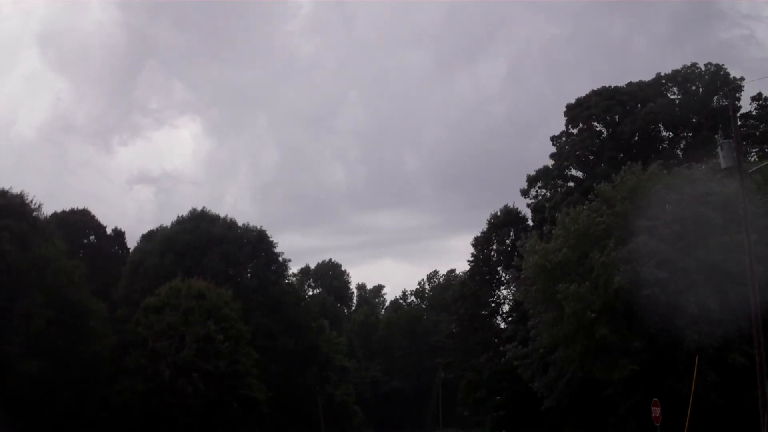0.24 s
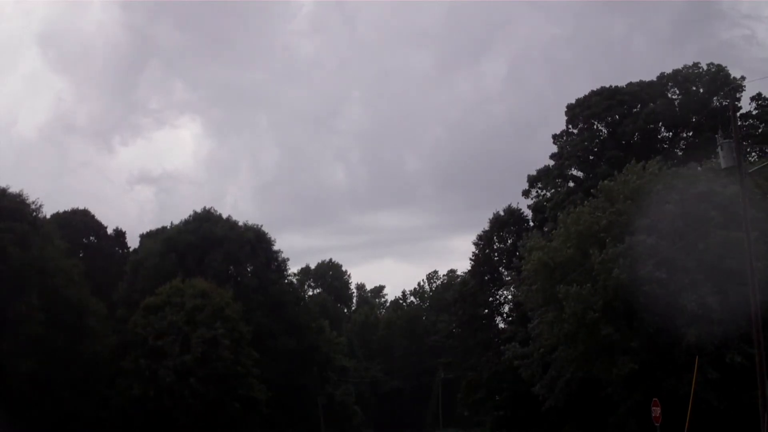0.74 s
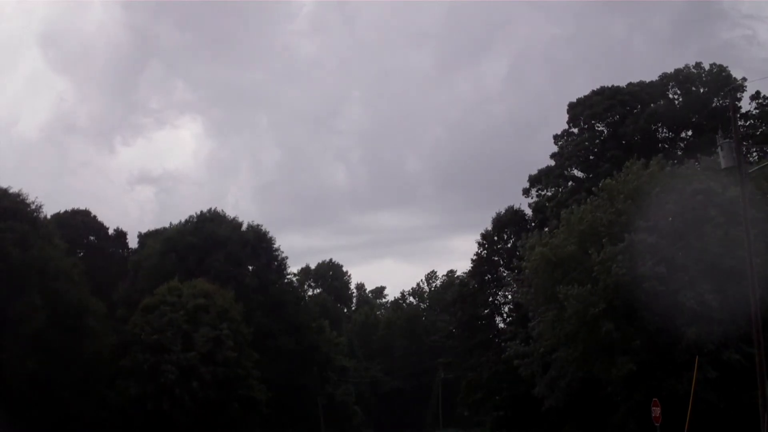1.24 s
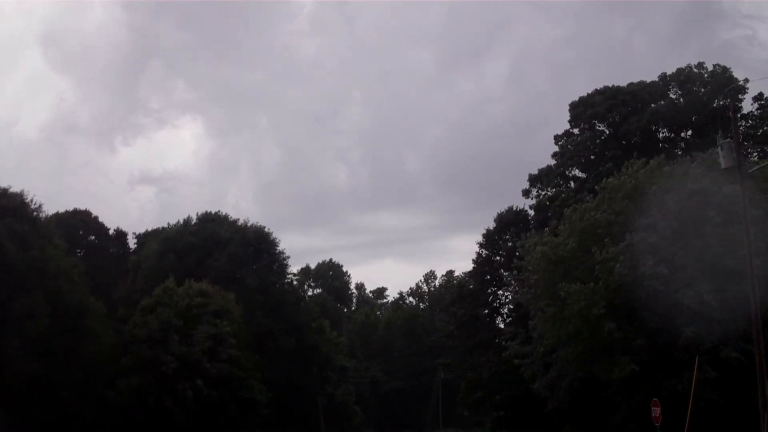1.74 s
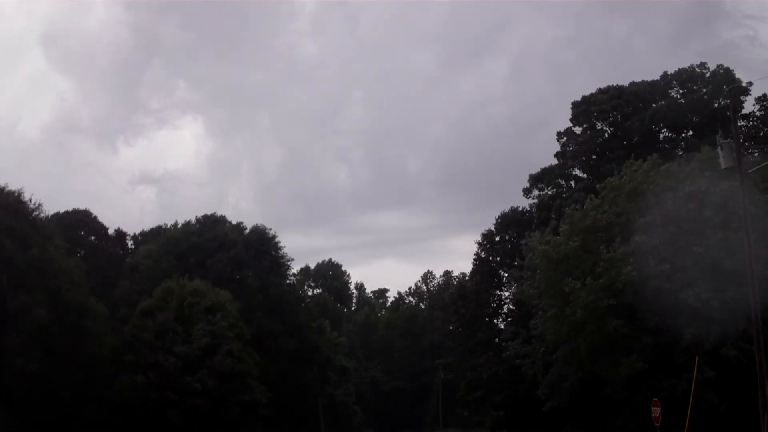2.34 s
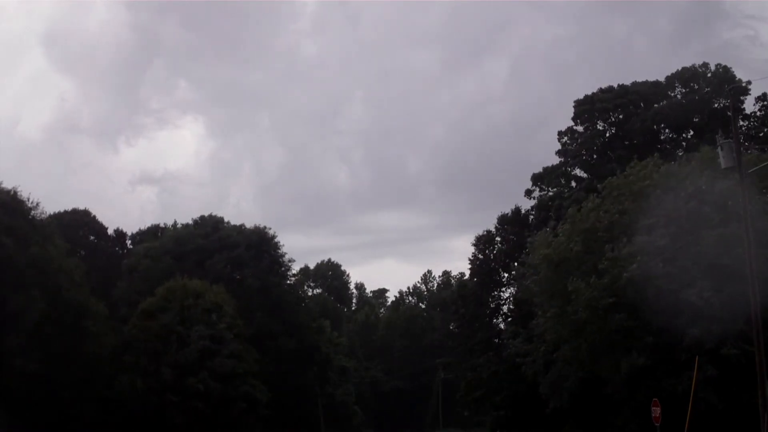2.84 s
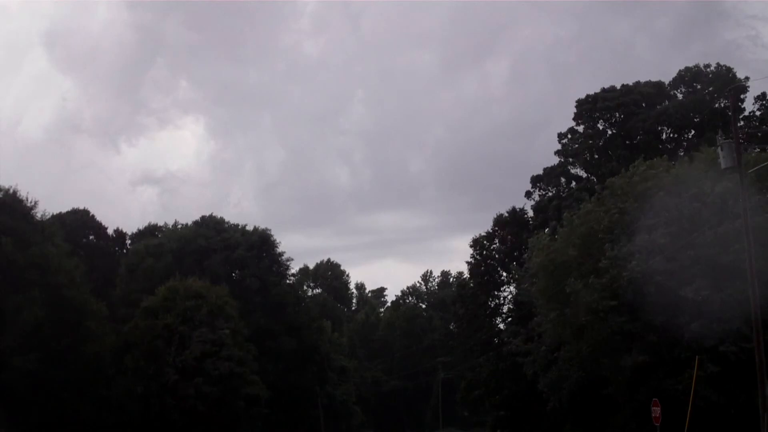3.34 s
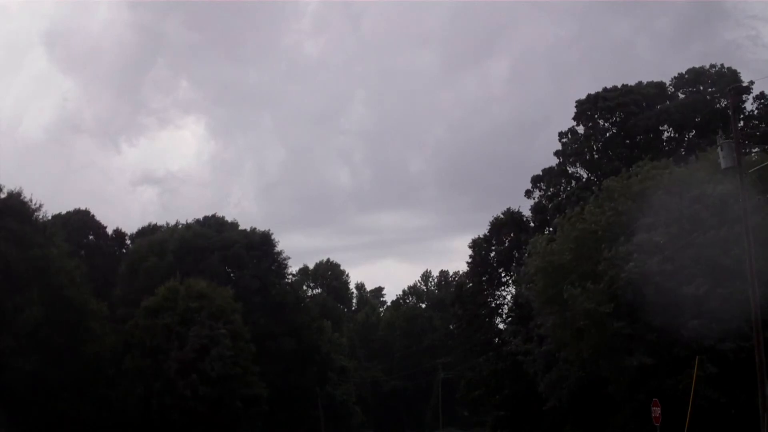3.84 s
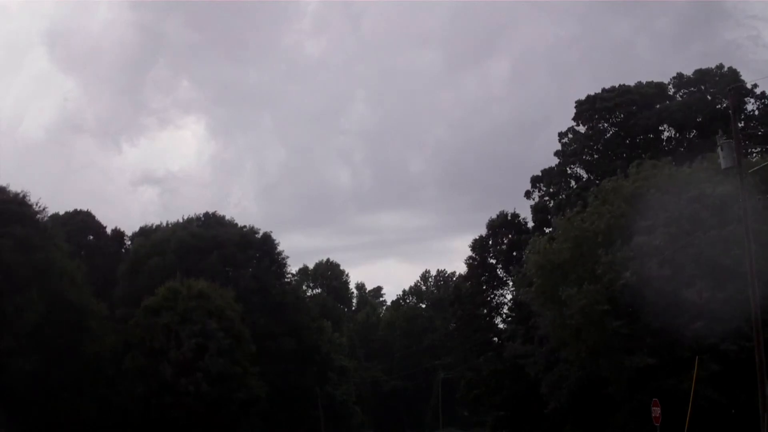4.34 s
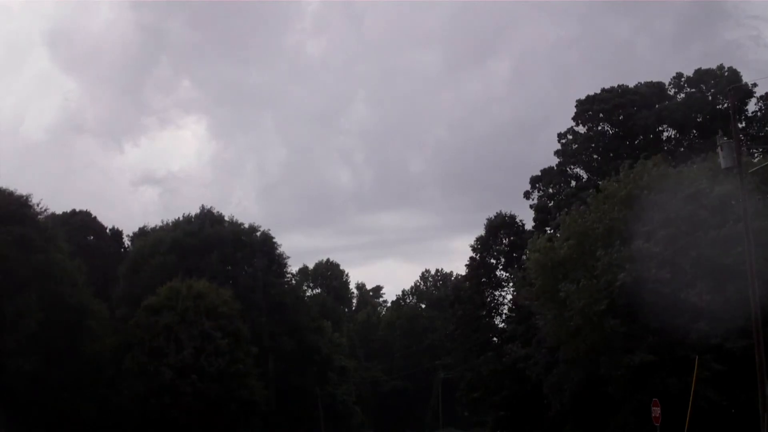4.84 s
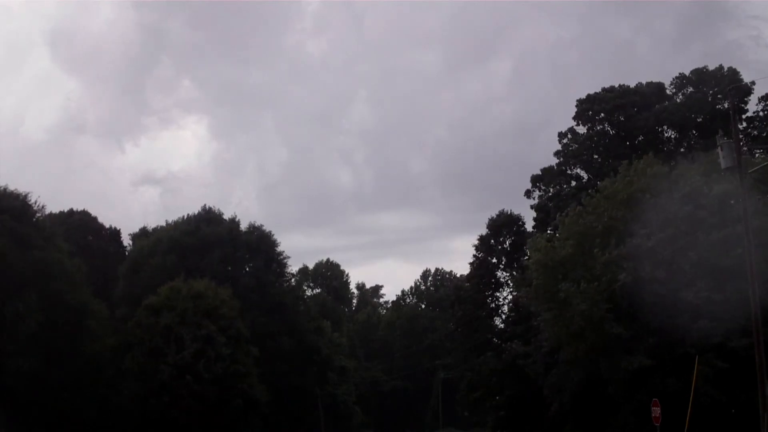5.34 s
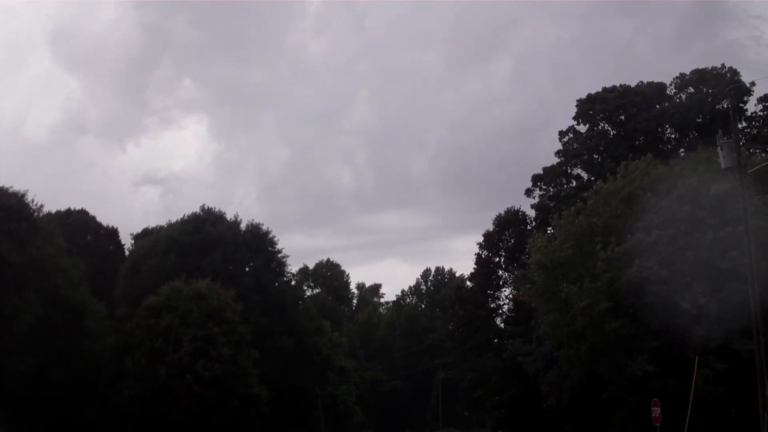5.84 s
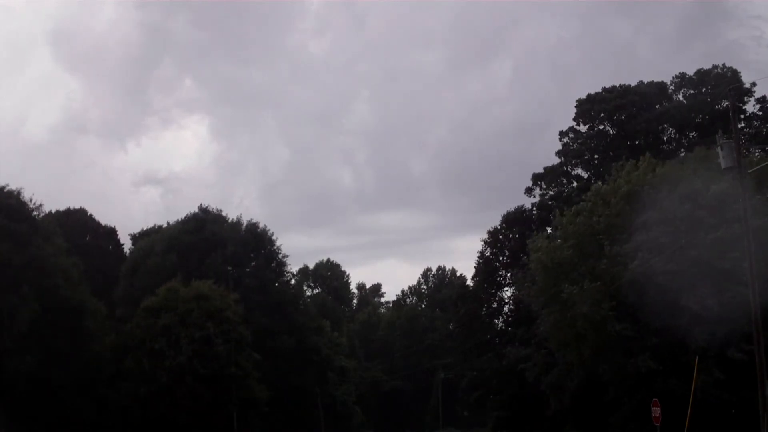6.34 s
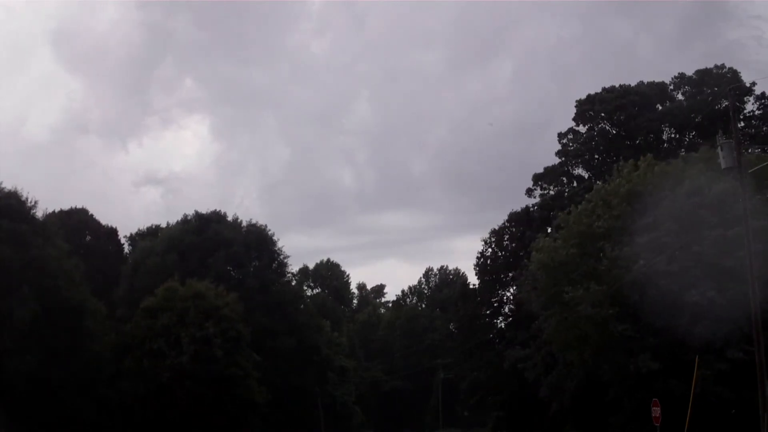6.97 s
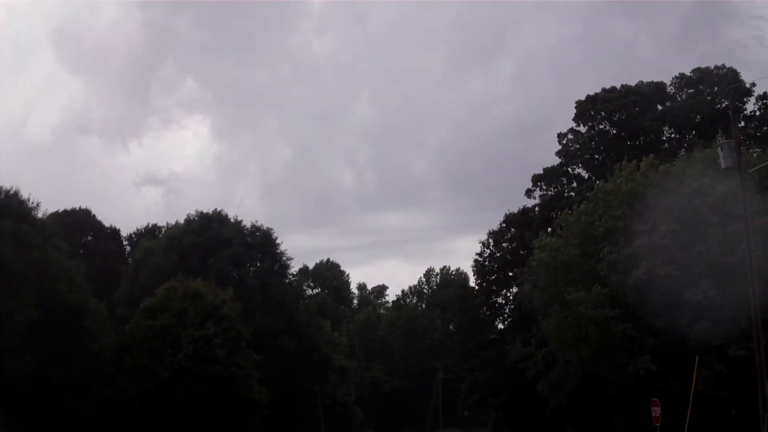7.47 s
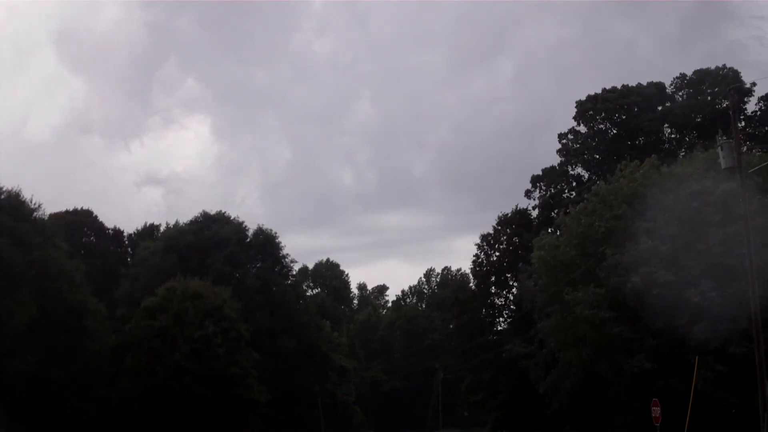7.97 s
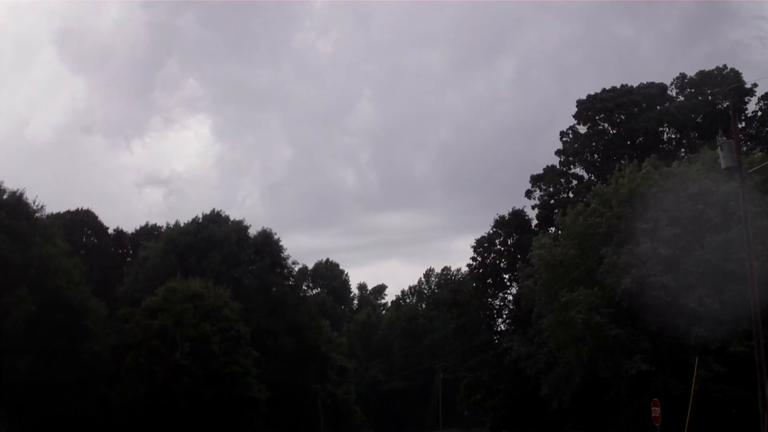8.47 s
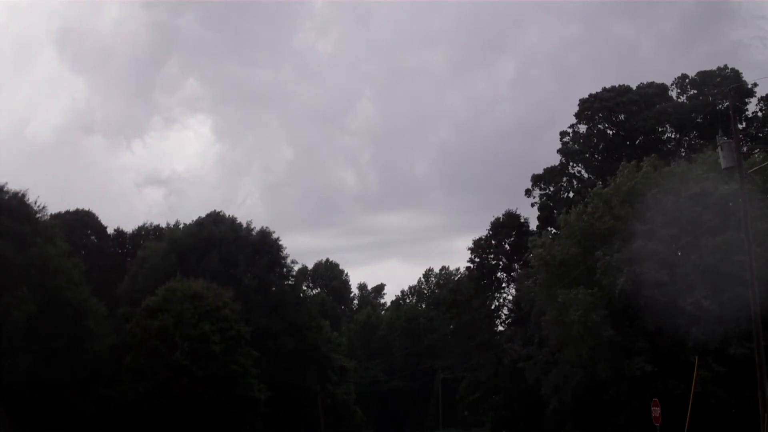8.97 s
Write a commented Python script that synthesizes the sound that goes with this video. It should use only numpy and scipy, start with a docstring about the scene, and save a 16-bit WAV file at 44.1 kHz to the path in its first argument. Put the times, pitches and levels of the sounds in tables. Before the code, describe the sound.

Close raindrops pop and tick in uneven clusters over a soft wash of distant rain on trees, with faint wind bumps.

```python
"""Rain heard from a sheltered spot facing trees, through a small camera microphone.
From the start, far rain and wind (shaped noise) and a faint whine (a sine) run on; near drops plop as short wave
packets with a noise tick, echoed by walls, some with a fizz. Wind knocks come until about 5 s, crackling splashes of
tiny plops now and then until nearly 8 s. Near 2.3 s a far honk (a few sines) sounds and the patter of weak drops
thickens; from about 5 s it thins, low drips plop near 6 s, the patter returns briefly near 7 s and fades back."""
import sys
import numpy as np
from scipy import signal
from scipy.fft import rfft, irfft
from scipy.io import wavfile
from scipy.ndimage import uniform_filter1d

SR = 44100
rng = np.random.default_rng(int(sys.argv[2]) if len(sys.argv) > 2 else 0)


def materialize(psi):
    """Save the field psi as 16-bit PCM at rate SR to the path in sys.argv[1].

    A 1-D psi becomes a single channel; in a 2-D psi each row is a channel.
    """
    bounded = np.clip(np.atleast_2d(psi).T, -1, 1)
    quanta = np.round(bounded * 32767).astype(np.int16)
    wavfile.write(sys.argv[1], SR, quanta)


def attenuation_scalar(level_db):
    """Turn a level in dB into a linear amplitude multiplier (20 dB per decade)."""
    decades = np.asarray(level_db, float) / 20
    return 10 ** decades


N = 406161  # length in samples

# Near drops with a voice of their own. Each row: start in seconds, strength of the plop in dB, its pitch in Hz,
# its length in cycles, its overtone in dB against the plop.
NEAR_DROPS = [(0.049, -26.5, 2340, 1.1, -22), (0.1697, -31, 2600, 4.7, -13),
              (0.215, -22.5, 2430, 1.24, -27), (0.2323, -31, 2740, 2.5, 4), (1.1109, -19, 1960, 3, -16.5),
              (1.1343, -27, 2510, 2.7, -9), (1.2827, -30.5, 1970, 1.3, -8), (1.5437, -17, 2190, 2.65, -30),
              (2.0273, -26, 2750, 4.5, -16), (2.1449, -20.5, 2100, 0.9, -21),
              (2.385, -12.5, 2520, 2.1, -28), (2.6757, -26, 2600, 2.9, -25),
              (2.6895, -22.5, 2320, 1.65, -18), (3.0853, -31.5, 1600, 1.6, -0.5),
              (3.156, -33.5, 2430, 3.2, 0), (3.9698, -35, 2220, 3, 5), (4.4503, -17.5, 1980, 1.74, -14.5),
              (5.1182, -21.5, 2300, 3, -11.5), (5.2796, -36.5, 2490, 1, -3), (5.4136, -24, 2580, 4.4, -17),
              (5.6041, -26, 2540, 2.2, -5), (5.743, -19, 2090, 2.9, -20), (6.0888, -29, 2900, 3.8, -15),
              (6.2653, -28.5, 2430, 1.1, -23), (6.7588, -26.0, 2370, 4.1, -8.5),
              (7.0086, -23, 2260, 3.5, -7), (7.0305, -28, 2400, 3.1, -1), (7.0964, -23.5, 2100, 3.7, -6),
              (7.1842, -23.5, 2430, 4.1, -9), (7.307, -30.5, 2110, 1.3, -11), (7.7014, -22, 3090, 1.5, -27),
              (7.7217, -24, 2400, 1.6, 2.5), (7.8208, -22.5, 2300, 0.78, -19), (8.5642, -39, 2340, 4.9, 2),
              (9.1892, -21.5, 2020, 2.15, -13.5)]


def near_drops():
    """The clearest drops bursting on a hard wet surface, each with its own pitch, length and overtone."""
    return drops(*np.transpose(NEAR_DROPS))


# Plainer near drops. Each row: start in seconds, strength of the plop in dB, its pitch in Hz.
PLAIN_DROPS = [(0.3261, -39, 3500), (0.3413, -33, 2690), (0.3853, -39.5, 3000), (0.4214, -32, 2860),
               (0.522, -34.5, 2690), (0.6537, -33, 3220), (0.672, -31, 2670), (0.6959, -39, 2600),
               (0.8436, -25, 2270), (0.946, -37, 2100), (0.987, -34.5, 2670), (1.0472, -28.5, 2430),
               (1.0841, -38, 3500), (1.198, -38, 2700), (1.3365, -28.5, 2520), (1.4992, -32, 2760),
               (1.53, -31, 2670), (1.698, -42, 3500), (1.8198, -36, 2300), (1.8653, -32.5, 2430),
               (1.8898, -32, 3240), (1.919, -38, 3150), (1.951, -30, 2750), (1.9603, -34.5, 2860),
               (2.0544, -34.5, 3310), (2.1192, -31.5, 3200), (2.1946, -31.5, 2260), (2.2437, -37, 2900),
               (2.2757, -29, 2600), (2.517, -36.5, 3940), (2.522, -38, 3200), (2.5507, -35.5, 3020),
               (2.586, -36, 3550), (2.8718, -41, 3350), (2.8881, -42, 4200), (2.9116, -32.5, 3030),
               (3.1263, -33, 3090), (3.175, -31.5, 2670), (3.279, -35.5, 3200), (3.3045, -28.5, 2080),
               (3.339, -35.5, 2970), (3.3836, -32, 3190), (3.4166, -27.5, 2280), (3.4376, -33.5, 3200),
               (3.4758, -31.5, 2510), (3.5419, -35.5, 3570), (3.6165, -35, 3550), (3.6852, -33, 3280),
               (3.725, -23.0, 2340), (3.8918, -27, 2510), (4.0465, -37.5, 3200), (4.1453, -34.5, 3400),
               (4.1801, -29.5, 2660), (4.212, -29, 2600), (4.233, -43, 4500), (4.2656, -35.5, 3200),
               (4.3166, -29, 2970), (4.319, -34, 2800), (4.379, -26.5, 2460), (4.4022, -32, 3570),
               (4.4174, -37, 3310), (4.4322, -26, 2260), (4.4698, -34, 2260), (4.52, -32, 3300),
               (4.6115, -29.5, 2570), (4.7067, -35.5, 3400), (4.8096, -32.5, 3280), (4.8481, -29, 2630),
               (4.8803, -29.5, 2380), (4.916, -28.5, 2720), (5.0618, -29, 2860), (5.2347, -33, 2770),
               (5.3097, -32, 2500), (5.3749, -36.5, 3050), (5.3914, -28, 2560), (5.475, -30, 2790),
               (5.49, -30, 2680), (5.5128, -33.5, 2920), (5.62, -27, 2250), (5.7001, -30, 2670),
               (5.832, -36, 2530), (5.8594, -27.5, 2500), (6.1498, -38.5, 3470), (6.2082, -33.5, 2430),
               (6.2948, -33.5, 2340), (6.3802, -31, 2190), (6.488, -38.5, 4250), (6.5043, -25, 2120),
               (6.5538, -30, 2520), (6.6198, -33, 2600), (6.6508, -36.5, 4100), (6.6884, -31.5, 2530),
               (6.7051, -35.5, 3810), (6.729, -30.5, 2360), (6.744, -34.5, 4080), (6.8036, -33, 2600),
               (6.865, -28.5, 2360), (6.9257, -25.5, 2360), (7.067, -31.5, 2050), (7.0778, -38, 4500),
               (7.1354, -32.5, 2510), (7.331, -29.5, 2510), (7.354, -38, 3810), (7.3725, -38, 4200),
               (7.4216, -31.5, 2430), (7.5208, -32.5, 3220), (7.5347, -37, 3600), (7.6182, -38, 2000),
               (7.6385, -36.5, 3810), (7.6774, -32.5, 2600), (7.711, -35, 3310), (7.741, -39, 4220),
               (7.797, -28.5, 2260), (7.8399, -38.5, 3800), (8.0177, -35.5, 3800), (8.2061, -38.5, 3120),
               (8.3835, -31.5, 2540), (8.4077, -33, 2440), (8.42, -36, 3700), (8.5462, -31, 2510),
               (8.5553, -29, 3000), (8.61, -39.5, 3870), (8.6826, -25, 2430), (8.7115, -33, 3620),
               (8.7385, -34.5, 4020), (8.7495, -27.5, 2360), (8.8235, -34.5, 3720), (8.8599, -31.5, 3680),
               (8.8756, -33, 3330), (8.9922, -33.5, 3500), (9.107, -30.5, 3660), (9.1517, -32, 3750)]


def plain_drops():
    """Smaller near drops, whose length and overtone follow one rule."""
    return droplets(*np.transpose(PLAIN_DROPS), length_s=0.0012)


def droplets(s, db, hz, length_s):
    """Small drops: the higher the plop, the purer it is; the weaker, the shorter (length_s holds at -31 dB)."""
    octaves_up = np.log2(np.maximum(hz / 2500, 1))
    over_db = -9.5 - 6 * octaves_up + 2 * rng.standard_normal(len(s))
    cycles = hz * length_s * attenuation_scalar(0.14 * (db + 31))
    return drops(s, db, hz, cycles, over_db)


def drops(s, db, hz, cycles, over_db):
    """A drop = plop, surface ring, echo, overtone, and a tick that is louder on brighter drops."""
    pitch_chance, tick_chance, echo_chance = rng.standard_normal((len(s), 3)).T
    body = plops(s, db, hz, cycles, glide=0.068)
    # the struck surface rings briefly under every drop
    body = body + plops(s + 0.00044, db - 20, np.full(len(s), 3200), cycles=4.5, glide=0)
    # a close surface returns the plop about a millisecond later: each landing spot gets its own notches
    echo_s = 0.000825 * (1 + 0.39 * np.tanh(echo_chance))
    body = body + plops(s + echo_s, db - 10, 1.022 * hz, cycles, glide=0.12)
    over_hz = np.maximum(1.76 * hz, 4300) * (1 + 0.057 * pitch_chance)
    over = plops(s + 0.0002, db + over_db, over_hz, cycles=4.5, glide=0.0091)
    voice = band(band(body + over, 955, 9700), 955, 9700)
    # the tick grows slower than the plop
    tick_db = 0.81 * db + 0.29 * over_db - 29.5 + 2 * tick_chance
    return voice + ticks(s + 0.00027, tick_db)


def plops(s, db, hz, cycles, glide):
    """Short wave packets: a swell, a few even cycles whose pitch glides up, a sudden drop to a faint ring."""
    t = np.arange(256) / SR
    age = t * (hz / np.clip(cycles, 0.7, 6))[:, None]  # 1 = the plop's length
    swell = 1 - np.exp(-(age / 0.19) ** 2.4)
    fall = 0.91 * np.exp(-(age / 0.71) ** 3.44) + 0.16 * np.exp(-age / 1.82)
    turns = hz[:, None] * t * (1 - glide + glide * age)
    wave = attenuation_scalar(db)[:, None] * swell * fall * np.sin(2 * np.pi * turns - 3.1)
    return place(s, wave)


# The sharpest splash ticks, high in the treble. Each row: start in seconds, strength in dB before the tick's filter.
SHARP_TICKS = [(1.2812, -48), (2.0263, -48), (2.143, -46), (3.5544, -44), (4.287, -47), (5.474, -44),
               (7.307, -50), (8.8593, -47)]


def sharp_ticks():
    """The sharpest splash ticks, most of them on top of a near drop's plop."""
    return ticks(*np.transpose(SHARP_TICKS))


def ticks(s, db):
    """Millisecond noise bursts of water hitting a hard face, lifted by the microphone's treble peak."""
    fall = np.exp(-np.arange(64) / SR / 0.00084)
    bursts = place(s, attenuation_scalar(db)[:, None] * rng.standard_normal((len(s), 64)) * fall)
    return band(bursts, 4000, 13600) + 0.5 * band(bursts, 9600, 11360)


# Dull low plops, as of drips into a puddle. Each row: start in seconds, strength in dB, pitch in Hz.
DRIPS_LOW = [(5.9597, -43, 850), (6.001, -43, 820), (6.0215, -42, 880)]


def drips():
    """Low plops with a gentle upward glide and no tick."""
    return plops(*np.transpose(DRIPS_LOW), cycles=3.8, glide=0.03)


# Big drops that shatter. Each row: start in seconds, strength of the faintest droplet in dB, centre pitch in Hz.
SHATTERED_DROPS = [(.234, -57, 5100), (2.387, -61, 3300), (3.086, -61, 5400), (4.453, -61, 4800),
                   (7.033, -63, 4930), (7.724, -58.5, 5000)]


def splashes():
    """A crackling cloud of tiny plops thrown up by the blow: it swells briefly and thins out."""
    droplets_each, swell_s = 200, 0.011
    s, db, hz = np.transpose([row for row in SHATTERED_DROPS for _ in range(droplets_each)])
    u = rng.random((len(s), 4)).T
    late_s = -swell_s * np.log(u[0] * u[1])
    droplet_hz = hz * 2 ** (0.53 * (u[3] - 0.5))
    return plops(s + late_s, db - 2 * np.log(u[2]), droplet_hz, cycles=4.2, glide=0)


def spray(x):
    """Bright drops throw up droplets that fall back as a fizz: it swells, then dies in some 50 ms."""
    t = np.arange(SR // 5) / SR
    fall = (t + 0.00095) * np.exp(-t / 0.0077)
    power = signal.fftconvolve(band(x, 4740, 6900) ** 2, fall / fall.sum())[:N]
    fizz = unit(band(rng.standard_normal(N), 3660, 6860))
    fizz = fizz + attenuation_scalar(-23) * unit(band(rng.standard_normal(N), 7500, 22000))
    return attenuation_scalar(-4.5) * np.sqrt(np.abs(power)) * fizz * crackle()  # falling droplets land in clumps


def walls(x):
    """Sparse scattered echoes from walls and floor, flickering unevenly, fading 60 dB in 0.15 s."""
    t = np.arange(SR // 5) / SR
    start = np.clip(t / 0.00029 - 0.5, 0, 1)
    echoes = rng.standard_normal(len(t)) ** 3 * start * attenuation_scalar(-60 * t / 0.15)  # cubing makes them sparse
    bright = signal.lfilter([1, -0.7], 1, x)  # hard faces scatter the treble best
    scattered = signal.fftconvolve(bright, echoes / np.sqrt(np.sum(echoes ** 2)))[:N]
    return attenuation_scalar(-6.5) * scattered * crackle()


def crackle():
    """Fast uneven gain that makes a sound flicker."""
    return attenuation_scalar(3.56 * walk(500))


def patter(spatter_db):
    """Weaker drops and lone ticks at random moments: many faint, few strong, all swelling with the spatter."""
    per_s, length_s = 220, 0.0008  # as many drops as lone ticks; the length is then varied from 0.25 to 1.25 times
    u = rng.random((int(per_s * N / SR), 6)).T
    drop_db = -53 - 3.95 * np.log(u[1]) + 0.41 * spatter_db[(u[0] * N).astype(int)]
    tick_db = -76 - 7.2 * np.log(u[5]) + 0.5 * spatter_db[(u[4] * N).astype(int)]
    hz = 2200 * 2 ** (1.15 * u[2])
    weak = droplets(u[0] * N / SR, np.minimum(drop_db, -42), hz, length_s * (0.25 + u[3] ** 2))
    return weak + ticks(u[4] * N / SR, np.minimum(tick_db, -56))


# How hard it rains. Each row: time in seconds, level of the far wash in dB, spatter in dB (only its rise and fall count).
RAIN_STRENGTH = [(0.0, -54, -62.5), (2.49, -54, -55.5), (4.62, -55.5, -57), (6.13, -54.5, -66.5),
                 (6.82, -55, -62.5), (8.03, -54, -67), (9.21, -55, -69)]


def shower():
    """The wash level, and the spatter around its own average, drawn as lines through the table."""
    s, *columns = np.transpose(RAIN_STRENGTH)
    level_db, spatter_db = (np.interp(np.arange(N) / SR, s, c) for c in columns)
    return level_db, spatter_db - spatter_db.mean()


# Tone colour of far rain and wind rumble. Each row: frequency in Hz, relative strength in dB per Hz.
WASH_COLOUR = [(20, 9), (45, -3), (90, -6.5), (190, -12), (300, -8.5), (735, 2.5), (1300, 1.5),
               (3000, -5.5), (4650, -13), (8900, -26.5), (10700, -34.5), (15500, -45)]
# The wind's hardest knocks on the microphone. Each entry: its peak moment in seconds.
WIND_KNOCKS = [0.19, 0.615, 0.785, 3.46, 3.64, 5.13]


def wash(level_db, spatter_db):
    """Far rain on leaves: the treble follows the spatter, each range flickers a little, gusts shake the bass."""
    gust_db, knock_db, knock_s = 2.8, 9, 0.025
    noise = rfft(unit(colour(rng.standard_normal(N), WASH_COLOUR)))
    f = np.fft.rfftfreq(N, 1 / SR)
    high = 1 / (1 + (3500 / (f + 1)) ** 4)
    low = 1 / (1 + (f / 170) ** 4)
    knocks = sum(np.exp(-((np.arange(N) / SR - s) / knock_s) ** 2) for s in WIND_KNOCKS)
    wind = irfft(noise * low, N) * attenuation_scalar(knock_db * knocks + gust_db * walk(40) - gust_db)
    leaves = irfft(noise * (1 - low - high), N) * attenuation_scalar(0.49 * walk(9.8))
    hiss = irfft(noise * high, N) * attenuation_scalar(0.27 * spatter_db + 1.4 * walk(22))
    return (wind + leaves + hiss) * attenuation_scalar(level_db)


# The honk's harmonics. Each row: multiple of the pitch, level in dB.
HONK_HARMONICS = [(4, -68), (6, -61), (7, -66)]


def honk():
    """A short steady harmonic note from far off, barely above the rain."""
    start_s, length_s, pitch_hz = 2.26, 0.15, 233
    t = np.arange(N) / SR
    swell = np.sin(np.pi * np.clip((t - start_s) / length_s, 0, 1)) ** 0.5
    return swell * sum(tone(k * pitch_hz, db) for k, db in HONK_HARMONICS)


# Whine of the camera electronics. Each row: frequency in Hz, level in dB.
WHINE_TONES = [(7897, -89)]


def whine():
    """A thin steady tone."""
    return sum(tone(hz, db) for hz, db in WHINE_TONES)


def tone(hz, db):
    """A steady sine with its rms level in dB."""
    return attenuation_scalar(db) * np.sqrt(2) * np.sin(2 * np.pi * hz * np.arange(N) / SR)


def place(s, waves):
    """Add one short wave at each start time in seconds."""
    out = np.zeros(N + 512)  # spare room for waves that run past the end
    length = np.arange(waves.shape[1])
    np.add.at(out, np.clip(s * SR, 0, N).astype(int)[:, None] + length, waves)
    return out[:N]


def band(x, lo_hz, hi_hz):
    """Band-pass that keeps the range between two frequencies."""
    return signal.sosfilt(signal.butter(2, [lo_hz, hi_hz], "band", fs=SR, output="sos"), x)


def colour(x, points):
    """Filter by a spectrum given as (Hz, dB) points."""
    hz, db = np.transpose(points)
    f = np.fft.rfftfreq(len(x), 1 / SR) + 1
    return irfft(rfft(x) * attenuation_scalar(np.interp(np.log(f), np.log(hz), db)), len(x))


def unit(x):
    """Scale to rms 1."""
    return x / np.sqrt(np.mean(x ** 2))


def walk(rate):
    """Random levels held 1 / rate seconds and smoothed twice; spread near 1."""
    k = int(SR / rate)
    steps = np.repeat(rng.standard_normal(N // k + 1), k)
    return 1.54 * uniform_filter1d(uniform_filter1d(steps, k), k)[:N]


def scene():
    """Drops with their echoes and spray, then splashes, honk and wash."""
    level_db, spatter_db = shower()
    near = near_drops() + plain_drops() + drips() + sharp_ticks() + patter(spatter_db)
    mix = near + walls(near) + spray(near) + splashes() + honk() + wash(level_db, spatter_db)
    return mix[None]


# Weak spots of the microphone path. Each row: centre in Hz, width in Hz.
WEAK_SPOTS = [(7850, 200), (12000, 300)]


def microphone(x):
    """Narrow dips in the treble and a steep cut of the top."""
    for hz, width in WEAK_SPOTS:
        x = 0.33 * x + 0.71 * signal.lfilter(*signal.iirnotch(hz, hz / width, SR), x)
    return signal.sosfilt(signal.cheby1(6, 0.5, 15400, fs=SR, output="sos"), x)


def band_limit(x):
    """A steep low-pass at the top of the band."""
    return signal.sosfilt(signal.butter(12, 16510, fs=SR, output="sos"), x)


def record(dry):
    """The microphone hears the scene, and the camera's whine joins it."""
    mix = microphone(dry) + whine()
    return band_limit(mix)


dry = scene()
out = record(dry)
materialize(out)
```